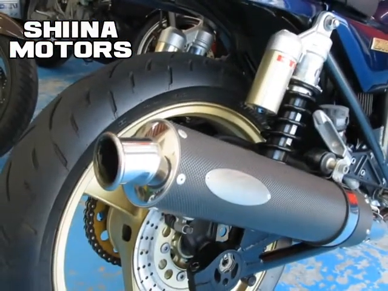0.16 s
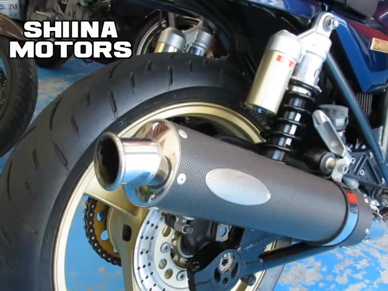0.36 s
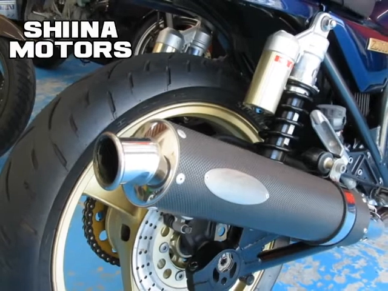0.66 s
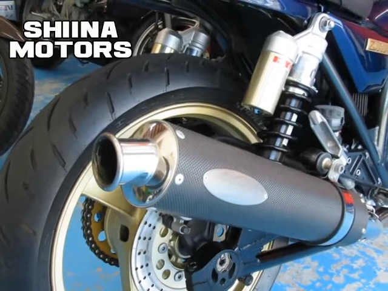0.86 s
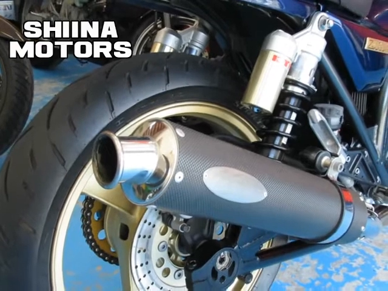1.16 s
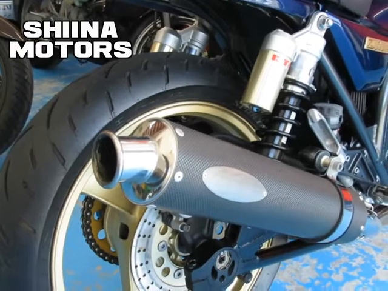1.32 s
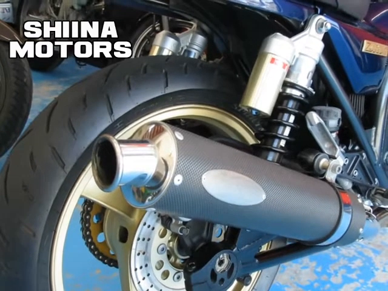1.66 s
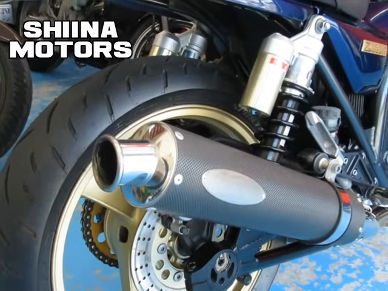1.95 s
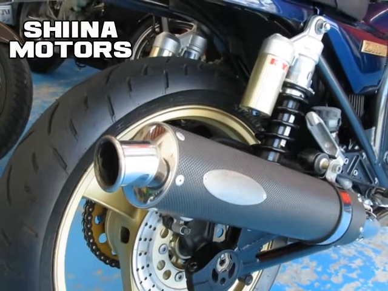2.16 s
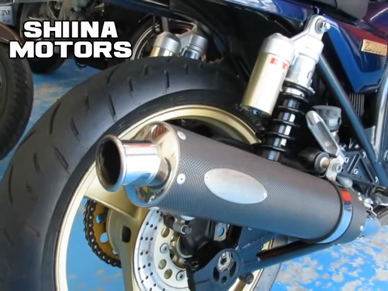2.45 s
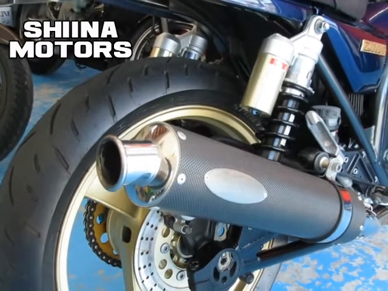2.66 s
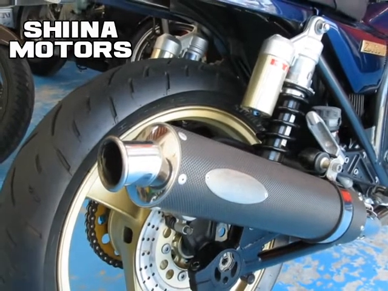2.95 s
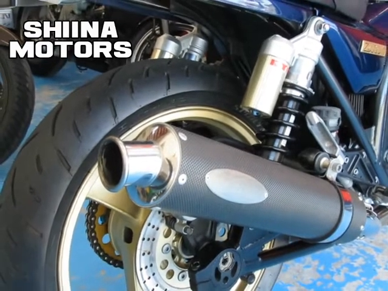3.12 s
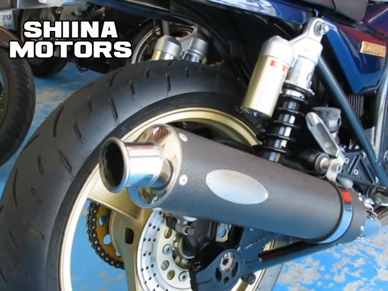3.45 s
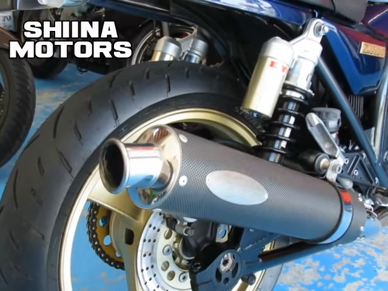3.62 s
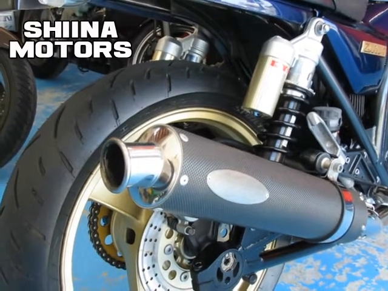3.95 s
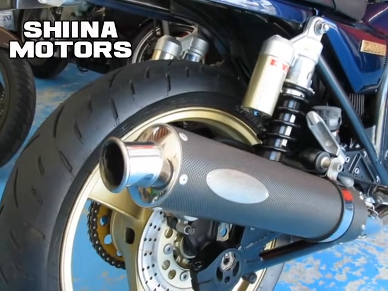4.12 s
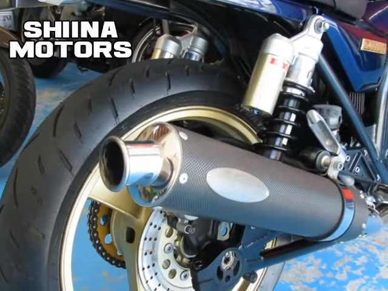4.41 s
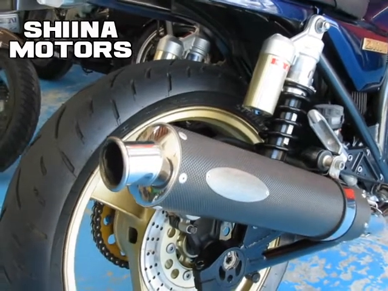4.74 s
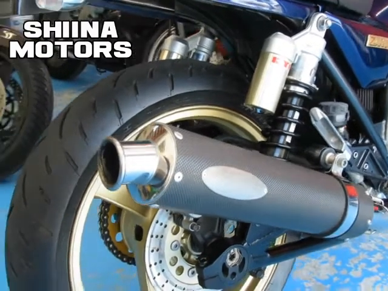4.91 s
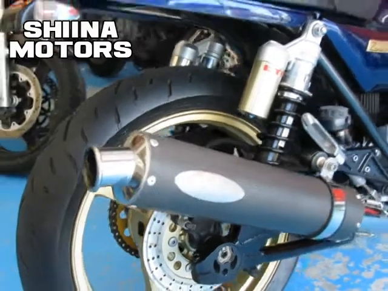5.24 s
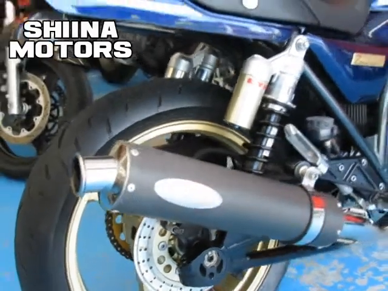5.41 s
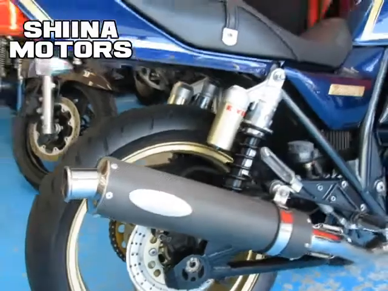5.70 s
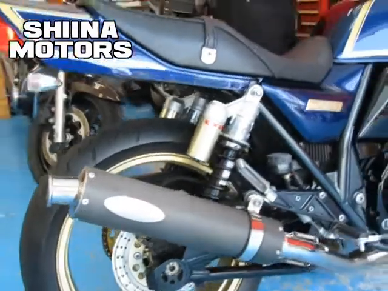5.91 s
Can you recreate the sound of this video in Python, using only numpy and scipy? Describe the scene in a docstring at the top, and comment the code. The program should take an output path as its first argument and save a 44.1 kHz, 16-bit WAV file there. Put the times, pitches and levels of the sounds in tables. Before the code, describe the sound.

A four-cylinder motorcycle idles with a low, uneven thump, heard close to its sports exhaust in a workshop with a short, tight echo. At about 0.5 seconds the throttle snaps open and the pitch climbs into a hard bark with hissing gas. It shuts at 1.1 seconds, and the engine rasps down to a stumbling idle, with a small pop around 1.5. A second rev rises from 2.4 to 2.9 seconds, followed by two quick, light pops just after 3. The third runs from 4.1 to 4.6 seconds, with two more pops around 4.8, the last one the strongest. The engine falls back roughly, and the exhaust gets a little quieter from 5 seconds as the microphone backs away. From about 5.6 seconds to the end, near 6, the idle evens out into a low hum with metallic valve ticking.

```python
"""A workshop, close to the sports silencer of a four-cylinder motorcycle that idles and is blipped 3 times.
Each firing thumps through the pipe; under throttle the pulses steepen into a bark with a hissing jet.
On the overrun the pipe rasps and unburnt fuel pops, then the engine stumbles back to idle over its
valve clatter. The walls add a short, tight tail."""
import sys
import numpy as np
from scipy import signal
from scipy.fft import rfft, irfft, next_fast_len
from scipy.io import wavfile
from scipy.ndimage import uniform_filter1d, map_coordinates

SR = 44100
rng = np.random.default_rng(int(sys.argv[2]) if len(sys.argv) > 2 else 0)


def int16_out(signal):
    """Quantize to a 16-bit WAV file."""
    q = np.round(np.clip(np.atleast_2d(signal).T, -1, 1) * 32767)
    wavfile.write(sys.argv[1], SR, q.astype(np.int16))


N = 267684

# throttle blips: opens t/s, shuts t/s, share of full throttle at the first twist
BLIPS = [(0.498, 1.112, 0.71), (2.393, 2.909, 0.97), (4.120, 4.629, 0.96)]
# spells of uneven combustion: start t/s, end t/s
STUMBLES = [(-0.3, 0.45), (1.14, 2.14), (2.93, 3.78), (4.658, 5.6)]
# exhaust mix under load: firing rate f/Hz, then level/dB of boom, growl, bark, jet
LOADED_MIX = [(46.6, -30, -43.5, -46, -51.5), (74.8, -18.5, -24.5, -35.5, -40.5),
              (124, -16, -15.5, -23, -36), (158, -21, -19, -20.5, -38), (204.2, -22.5, -20, -17.5, -36.5)]
# exhaust mix with the throttle shut: firing rate f/Hz, then level/dB of boom, growl, bark, jet
COASTING_MIX = [(46, -34, -45.5, -52, -62), (66, -35.5, -43.5, -55, -62), (105.72, -33, -39.5, -45.5, -67),
                (146, -32.5, -40.5, -37.5, -56.5), (227, -17, -34, -28.5, -41)]
# the boom swells and sags as the note passes the pipe's standing waves: firing rate f/Hz, level/dB
STANDING_WAVES = [(100, -1), (121, 1.5), (135, -6), (153, 3.5), (175, -13), (189, -3), (201, -6.5),
                  (211, -32.5), (221, -20.5)]
# the listener drifts, then backs from the tip toward the engine: t/s, exhaust level/dB, clatter level/dB
POSITION = [(0, 3, 7.5), (0.6, -1, -2.5), (4.9, -0.5, 0.5), (5.5, -3.5, -0.5), (6.07, -5, -1.5)]
# low-end body of pipe and silencer: f/Hz, level/dB
PIPE_EQ = [(8, -56), (25, -14), (45, -2), (68, -4), (92, 4.5), (125, -2), (150, -10.5), (195, -1),
           (260, 1.5), (380, 0), (450, -9.5), (530, -21.5), (900, -52)]
# metallic tone of the valve gear: f/Hz, level/dB
METAL_EQ = [(260, -0.5), (450, 5.5), (631, -2), (752, -1), (1310, -3.5), (1640, -4), (2820, -5.5),
            (4570, -16.5), (5610, -20.5), (9110, -31.5), (15000, -44)]
# midrange bite of the fronts leaving the tip: f/Hz, level/dB
BARK_EQ = [(150, -60), (330, -62), (570, -1.5), (690, 0), (860, -5.5), (1110, 0.5), (1450, -4), (1870, -7),
           (2450, -4), (3050, -15.5), (3700, -16), (4800, -21), (7000, -32.5), (9000, -43.5), (15000, -75)]
# ringing modes of the silencer can: f/Hz, width/Hz, relative level/dB
CAN_MODES = [(1142, 100, 0), (1387, 106, -3), (1330, 29, 6.5), (2020, 160, -11), (3700, 74, 2.5),
             (4680.5, 40, 9.5)]
# each front and the reflections that follow it down the pipe: delay t/s, gain
REFLECTIONS = [(0, 1), (.0013, 0.028), (.0027, 0.36)]
# sizzle of the gas jet: f/Hz, level/dB
JET_EQ = [(1500, -63), (2700, -13), (3250, 9.5), (3650, 19), (4200, 10.5), (4750, 12), (5600, 4),
          (6800, 4.5), (8000, 1), (13000, -1.5), (15500, -5)]
# stereo image of the noise: f/Hz, left-right likeness (1 is mono)
LIKENESS = [(1000, 1), (2000, 0.99), (4000, 0.92), (8000, 0.53), (14000, 0.12)]
# decay of the room: f/Hz, time to fall 60 dB t/s
ROOM_DECAY = [(100, 0.3), (1200, 0.43), (4000, 0.3), (12000, 0.083)]
# width of the room's tail, side against middle: f/Hz, level/dB
ROOM_WIDTH = [(30, -40), (80, -40), (150, -51), (280, -14), (500, -25.5), (1100, -33), (2200, -13.5),
              (4500, -5.5), (10000, -8)]
# afterfire in the pipe: t/s, approximate peak level/dB
POPS = [(1.508, -28.5), (3.011, -28), (3.06, -25), (4.799, -23.5), (4.864, -17)]

TWIST_S, WIND_ON_S, RETURN_S = 0.02, 0.3, 0.088  # the grip snaps open, is wound on to full, springs back
START_HZ, IDLE_HZ, CEILING_HZ = 52, 45.3, 256  # engine speed ("rate") is in firings per second
PULL_PER_S = 6.118  # growth of speed at full throttle
FRICTION_HZ_PER_S, DRAG_PER_S = 62, 1.487  # engine braking: constant, and in proportion to speed
CATCH_HZ = 17.1  # this far above idle the braking eases off
LOAD_ATTACK_S, LOAD_RELEASE_S = 0.051, 0.059  # combustion pressure builds and collapses
STUMBLE_GROWS_S, STUMBLE_CLEARS_S = 0.46, 0.049
SMOOTH_ROUGH, STUMBLE_ROUGH = 0.14, 1  # roughness outside and inside a stumble
LURCH_DB, LURCH_PER_S = 2.8, 32  # the exhaust's level wanders with roughness
SETTLE_S, SETTLED_BOOM_DB, SETTLED_CLATTER_DB = 0.16, 0.5, 11.5  # lifts as the idle evens out
ROUGH_CHURN, LOADED_CHURN = 0.85, 0.076  # churning gas against the pulses
HUM_HZ, HUM_WIDTH_HZ, HUM_DB = 91, 20, -29.5  # the pipe's lowest mode
CLATTER_DB, CLATTER_DB_PER_OCTAVE = -51, 5  # base level, and its rise with speed
STEEP_FROM_HZ, STEEP_FULL_HZ = 97, 173  # speeds between which loaded pulses steepen into fronts
FRONT_SCATTER_DB, FRONT_JITTER_S = 4.5, 0.00003
SPIT_DB, SPIT_LEAD_S, SPIT_HALF_S = 4, 0.01, 0.0073  # the jet spits as the grip is let go
BLARE_HZ, BLARE_WIDTH_HZ, BLARE_DB = 1440, 560, -0.5
BLARE_FROM_HZ, BLARE_FULL_HZ = 122, 190  # speeds between which the blare fades in
TOP_HZ = 15250


def amp(db):
    """Decibels to gain."""
    return 10 ** (np.asarray(db) / 20)


def ramp(x):
    """x held between 0 and 1."""
    return np.clip(x, 0, 1)


def along(points, hz):
    """Read (f/Hz, value) points on a log frequency axis."""
    f, v = np.transpose(points)
    return np.interp(np.log(hz + 1), np.log(f + 1), v)


def lookup(rows, x):
    """One curve for each later column, read where the first column equals x."""
    axis, *columns = np.transpose(rows)
    return np.array([np.interp(x, axis, column) for column in columns])


def steady(x, size=2800):
    """Leveller: rides x to a short-term rms of 1."""
    power = np.mean(np.atleast_2d(x) ** 2, axis=0)
    return x / np.sqrt(np.abs(uniform_filter1d(uniform_filter1d(power, size), size)) + 1e-14)


def filtered(x, response):
    """x through a complex frequency response."""
    m = 2 * next_fast_len(N // 2 + SR // 4)
    return irfft(rfft(x, m) * response(np.fft.rfftfreq(m, 1 / SR)), m)[..., :N]


def eq(x, points):
    """Minimum-phase EQ drawn through (f/Hz, level/dB) points."""
    def response(hz):
        cepstrum = irfft(np.log(amp(along(points, hz))))
        half = len(cepstrum) // 2
        cepstrum[1:half] *= 2
        cepstrum[half + 1:] = 0
        return np.exp(rfft(cepstrum))
    return filtered(x, response)


def noise():
    """Stereo white noise, centred in the lows and wide in the treble."""
    def mid_side(hz):
        angle = np.arccos(np.clip(along(LIKENESS, hz), -1, 1)) / 2
        return np.array([np.cos(angle), np.sin(angle)])
    mid, side = filtered(rng.standard_normal((2, N)), mid_side)
    return np.array([mid + side, mid - side])


def wobble(per_s):
    """A smooth random curve with per_s knots a second."""
    return map_coordinates(rng.standard_normal(1000), [np.arange(N) * per_s / SR], mode="wrap")


def pulses(times, sizes):
    """Band-limited clicks at the given times."""
    taps = np.floor(times * SR).astype(int)[:, None] + np.arange(-7, 9)
    offset = taps - times[:, None] * SR
    shape = np.sinc(offset) * np.cos(np.pi * offset / 16) ** 2
    return np.bincount(np.clip(taps, 0, N).ravel(), (sizes[:, None] * shape).ravel(), N + 1)[:N]


def fading(train, decay_s):
    """Gives each click an exponential tail."""
    return signal.lfilter([1], [1, -np.exp(-1 / (decay_s * SR))], train)


def grip(t):
    """Throttle opening, 0-1: a quick twist, wound on to full, then let go."""
    opening = 0
    for opens, shuts, first in BLIPS:
        twist = ramp((t - opens) / TWIST_S)
        wind_on = ramp(first + (1 - first) * ramp((t - opens) / WIND_ON_S) ** 2)
        opening += np.minimum(twist, wind_on) * ramp(1 - (t - shuts) / RETURN_S)
    return opening


def crankshaft(t, step_s=0.002):
    """Firings per second: the throttle pulls toward a ceiling, engine braking drags back to idle."""
    steps = np.arange(0, t[-1], step_s)
    speeds = [START_HZ]
    for throttle in grip(steps[:-1]):
        hz = speeds[-1]
        pull = PULL_PER_S * hz * (1 - hz / CEILING_HZ)
        braking = (FRICTION_HZ_PER_S + DRAG_PER_S * hz) * np.tanh((hz - IDLE_HZ) / CATCH_HZ)
        speeds.append(hz + step_s * (throttle * pull - (1 - throttle) * braking))
    return np.interp(t, steps, speeds)


def combustion(t, rate):
    """Three 0-1 controls: how hard the engine pulls, how roughly it burns, how settled the idle is."""
    load = sum(ramp((t - opens) / LOAD_ATTACK_S) * ramp(1 - (t - shuts) / LOAD_RELEASE_S)
               for opens, shuts, _ in BLIPS)
    stumble = sum(ramp((t - start) / STUMBLE_GROWS_S) * ramp(.5 + (end - t) / STUMBLE_CLEARS_S)
                  for start, end in STUMBLES)
    rough = ramp(SMOOTH_ROUGH + (STUMBLE_ROUGH - SMOOTH_ROUGH) * stumble)
    calm = (1 - rough) * ramp(1 - (rate - IDLE_HZ) / CATCH_HZ)
    settled = calm * fading(calm, SETTLE_S) / (SETTLE_S * SR)
    return load, rough, settled


def exhaust_levels(t, rate, load, rough, settled):
    """Fader rides in dB for boom, growl, bark and jet, following speed and load."""
    boom, growl, bark, jet = load * lookup(LOADED_MIX, rate) + (1 - load) * lookup(COASTING_MIX, rate)
    boom = boom + lookup(STANDING_WAVES, rate)[0] + SETTLED_BOOM_DB * settled * (1 - load)
    lurch = LURCH_DB * rough * wobble(LURCH_PER_S)
    spit = SPIT_DB * sum(np.exp(-((t - shuts + SPIT_LEAD_S) / SPIT_HALF_S) ** 2) for _, shuts, _ in BLIPS)
    return np.array([boom + lurch, growl + lurch, bark + 0.67 * (lurch + spit), jet + lurch + spit])


def firings(rate, roughness, cylinder_db, scatter_db, jitter):
    """Times and sizes of the exhaust pulses; four unequal cylinders take turns."""
    count = np.cumsum(rate) / SR
    k = np.arange(1, int(count[-1]))
    times = np.interp(k, count, np.arange(N) / SR)
    rough = roughness[(times * SR).astype(int)]
    size_luck, time_luck = rng.standard_normal((len(k), 2)).T
    imbalance = np.array([1, -.5, .5, -1])[k % 4]
    sizes = amp(cylinder_db * imbalance + scatter_db * rough * np.tanh(size_luck))
    return times + jitter * rough * time_luck * np.gradient(times), sizes


def thump(times, sizes, rate, load, rough, settled, boom_db, growl_db, hum_db):
    """Each slug of gas rings the pipe's low modes; bad burns on a shut throttle leave the gas churning."""
    churn_gain = ROUGH_CHURN * rough * (1 - load) + LOADED_CHURN * load
    churn = eq(churn_gain * rng.standard_normal(N), PIPE_EQ)
    # a quarter-cycle turn: each pulse dips first, then swings sharply up
    clean = filtered(eq(steady(pulses(times, sizes)), PIPE_EQ), lambda hz: -1j)
    bass = lambda hz: 1 / (1 + (hz / 225) ** 12)
    boom = steady(filtered(clean + churn * IDLE_HZ / rate, bass))
    growl = steady(filtered(clean + churn, lambda hz: 1 - bass(hz)))
    # at calm idle the second harmonic sits on the pipe's lowest mode and hums cleanly
    hum = steady(filtered(clean, lambda hz: 1 / (1 + ((hz - HUM_HZ) / HUM_WIDTH_HZ) ** 4)))
    return amp(boom_db) * boom + amp(growl_db - 1.9 * settled) * growl + settled * amp(hum_db) * hum


def valve_gear(rate, level_db, scatter_db, whirr_db):
    """Two valve taps for each firing over the whirr of chain and gears."""
    count = np.cumsum(2 * rate) / SR
    times = np.interp(np.arange(int(count[-1])) + .5, count, np.arange(N) / SR)
    sizes = amp(scatter_db * rng.standard_normal(len(times)))
    ticks = steady(fading(pulses(times, sizes), decay_s=0.0021))
    return amp(level_db) * steady(eq((ticks + amp(whirr_db)) * noise(), METAL_EQ))


def silencer(x, ring_db):
    """Sharp fronts leave the tip directly and also ring the can."""
    def modes(hz):
        return sum(amp(db) * 1j * hz * width / (centre ** 2 - hz ** 2 + 1j * hz * width)
                   for centre, width, db in CAN_MODES)
    return filtered(x, lambda hz: amp(along(BARK_EQ, hz)) * (1 + amp(ring_db) * modes(hz)))


def bark(times, sizes, power, flow_db):
    """Steep fronts and their reflections at high power; at low power, turbulent rasp takes over."""
    fronts = steady(sum(pulses(times + delay, gain * sizes) for delay, gain in REFLECTIONS))
    puffs = steady(fading(fronts, decay_s=0.0043))
    rasp = steady((puffs + amp(flow_db)) * noise())
    rasp_db = 9 - 17 * power
    return steady(silencer(amp(rasp_db) * rasp - fronts, ring_db=-3))


def jet(times, sizes, scatter_db, flow_db):
    """Gas hisses over the lip of the tip at every pulse; the strongest pulses spit sharply."""
    spits = sizes * amp(scatter_db * rng.standard_normal(len(times)))
    puffs = steady(fading(pulses(times, spits), decay_s=0.0057))
    hiss = steady((puffs + amp(flow_db)) * noise())
    crackle = .6 * steady(fading(pulses(times, spits ** 2), decay_s=.0005) * noise(), size=7000)
    return steady(eq(hiss + crackle, JET_EQ))


def workshop(x):
    """The walls' short answer, nearly mono in the bass."""
    hz, t, spectra = signal.stft(rng.standard_normal((2, SR // 2)), SR, nperseg=256)
    decay = amp(-60 * t / along(ROOM_DECAY, hz)[:, None])
    tails = signal.istft(spectra * decay, SR, nperseg=256)[1]
    mid, side = (signal.fftconvolve(x, tail[None] / np.linalg.norm(tail), axes=1)[:, :N]
                 for tail in tails)
    return mid + filtered(side, lambda hz: amp(along(ROOM_WIDTH, hz))) * [[1], [-1]]


def blare(x, rate):
    """Near the top of a rev the bark focuses into one hard band."""
    peak = lambda hz: 1j * hz * BLARE_WIDTH_HZ / (BLARE_HZ ** 2 - hz ** 2 + 1j * hz * BLARE_WIDTH_HZ)
    fade_in = ramp((rate - BLARE_FROM_HZ) / (BLARE_FULL_HZ - BLARE_FROM_HZ))
    return steady(x + amp(BLARE_DB) * fade_in * filtered(x, peak))


def afterfire(decay_s):
    """Unburnt fuel pops inside the silencer."""
    times, db = np.transpose(POPS)
    pops = silencer(fading(pulses(times, amp(db)), decay_s) * noise(), ring_db=12)
    return pops * amp(db.max()) / np.abs(pops).max()


def scene():
    """The throttle drives one crankshaft, which drives exhaust and valve gear."""
    t = np.arange(N) / SR
    rate = crankshaft(t)
    load, rough, settled = combustion(t, rate)
    power = load * ramp((rate - STEEP_FROM_HZ) / (STEEP_FULL_HZ - STEEP_FROM_HZ))
    exhaust_db, engine_db = lookup(POSITION, t)
    boom_db, growl_db, bark_db, jet_db = exhaust_db + exhaust_levels(t, rate, load, rough, settled)
    times, sizes = firings(rate, rough, cylinder_db=-0.64, scatter_db=6.0, jitter=0.0432)
    low = thump(times, sizes, rate, load, rough, settled, boom_db, growl_db, exhaust_db + HUM_DB)
    # the steep front is each thump's attack, and varies more in size
    front_sizes = sizes * amp(FRONT_SCATTER_DB * np.tanh(rng.standard_normal(len(times))))
    front_times = times + FRONT_JITTER_S * rng.standard_normal(len(times))
    high = amp(bark_db) * blare(bark(front_times, front_sizes, power, flow_db=10), rate)
    high += amp(jet_db) * jet(front_times, front_sizes, scatter_db=2.5, flow_db=-11)
    high += afterfire(decay_s=0.003)
    # the walls give back little of the deepest boom
    low_send = filtered(low, lambda hz: 1 - 1 / (1 + (hz / 160) ** 6))
    walls = workshop(amp(-10) * high + amp(-10.5) * low_send)
    rev_lift_db = CLATTER_DB_PER_OCTAVE * np.log2(rate / IDLE_HZ)
    clatter_db = engine_db + CLATTER_DB + rev_lift_db + SETTLED_CLATTER_DB * settled
    return low + high + walls + valve_gear(rate, clatter_db, scatter_db=13.5, whirr_db=11.5)


def record(dry):
    """A soft clip rounds off the tallest peaks, then a brick-wall filter cuts the very top."""
    rounded = dry / (1 + np.abs(dry / .9) ** 8) ** (1 / 8)
    return filtered(rounded, lambda hz: hz < TOP_HZ)


dry = scene()
out = record(dry)
int16_out(out)
```